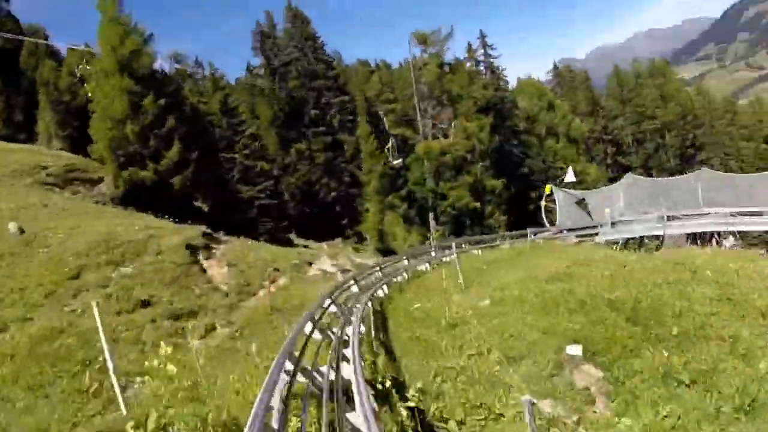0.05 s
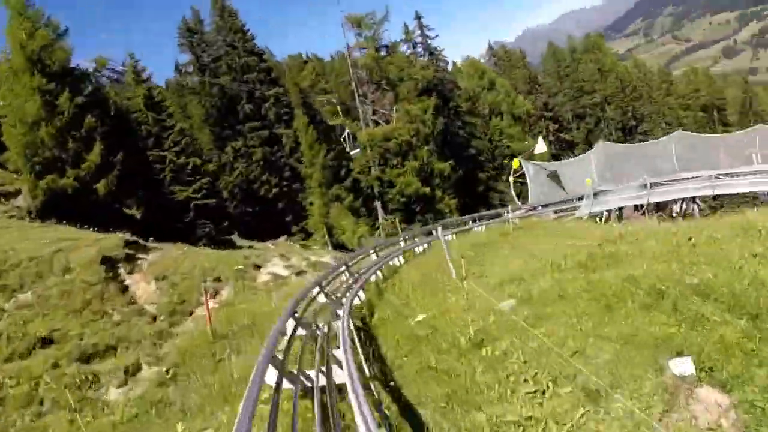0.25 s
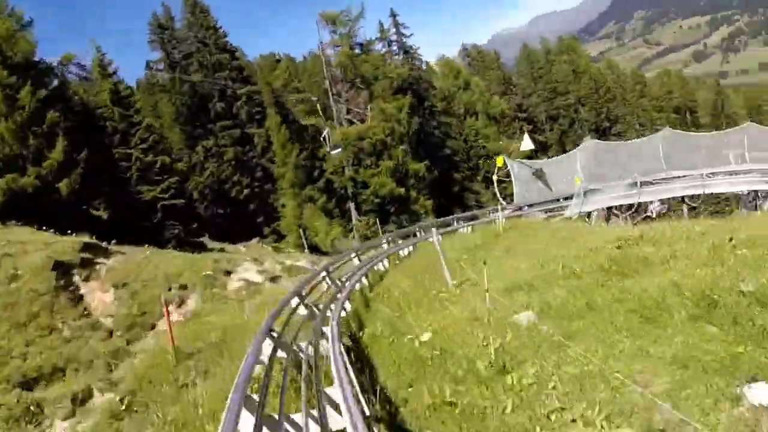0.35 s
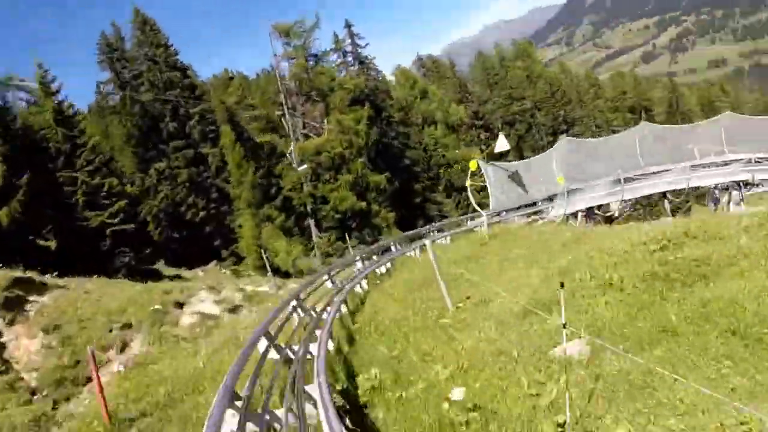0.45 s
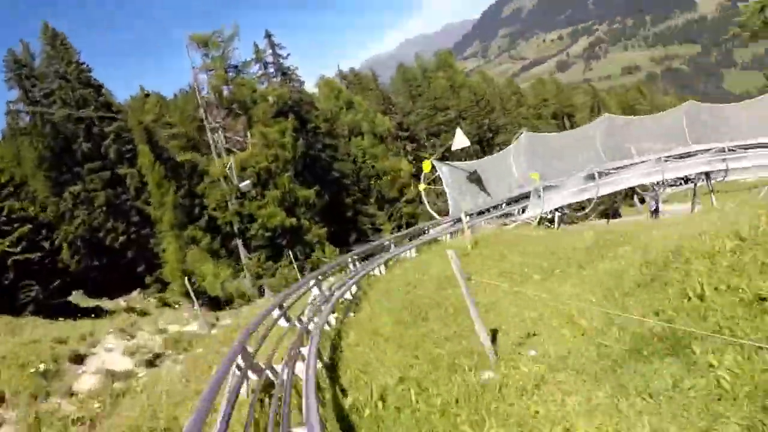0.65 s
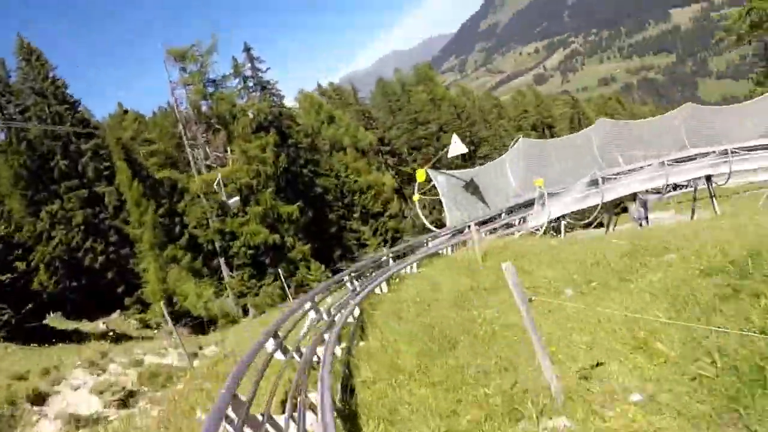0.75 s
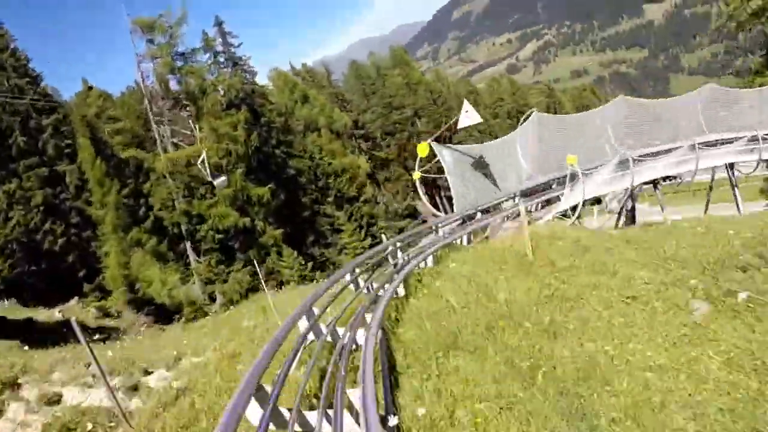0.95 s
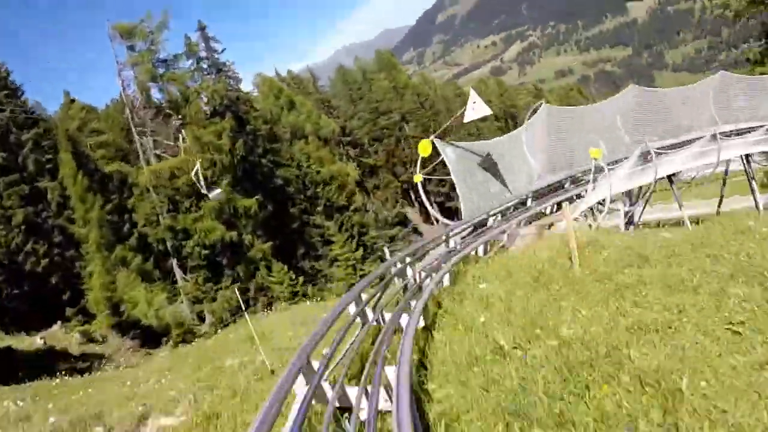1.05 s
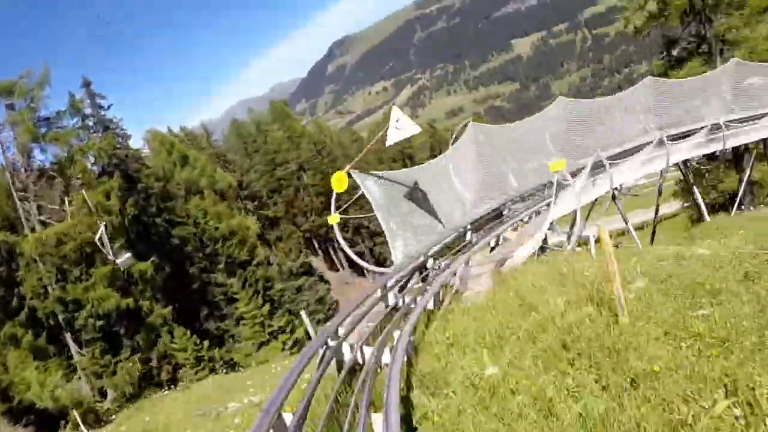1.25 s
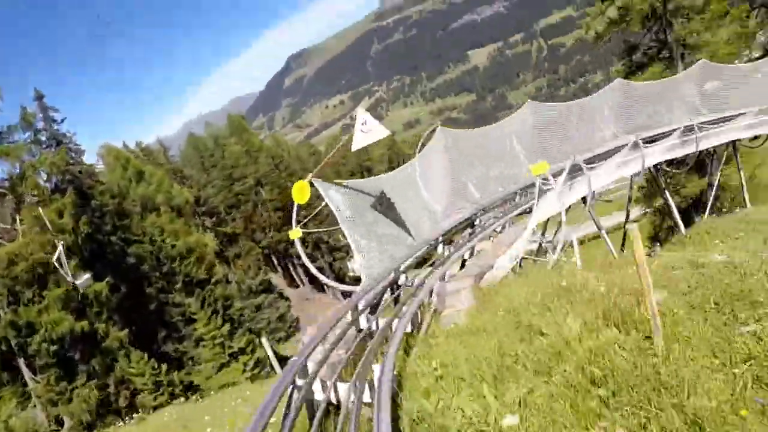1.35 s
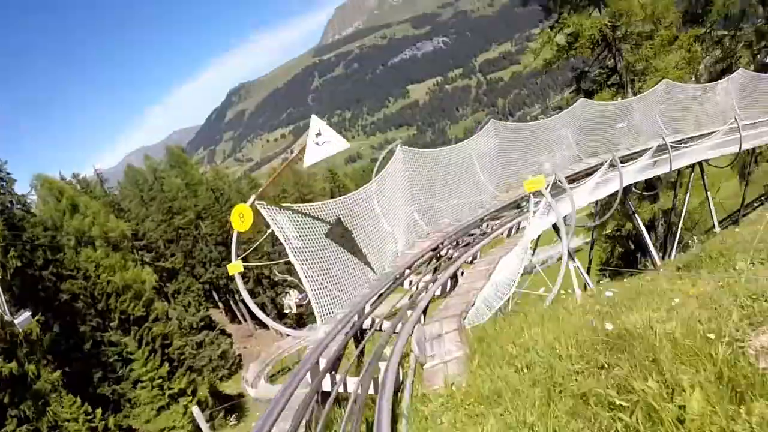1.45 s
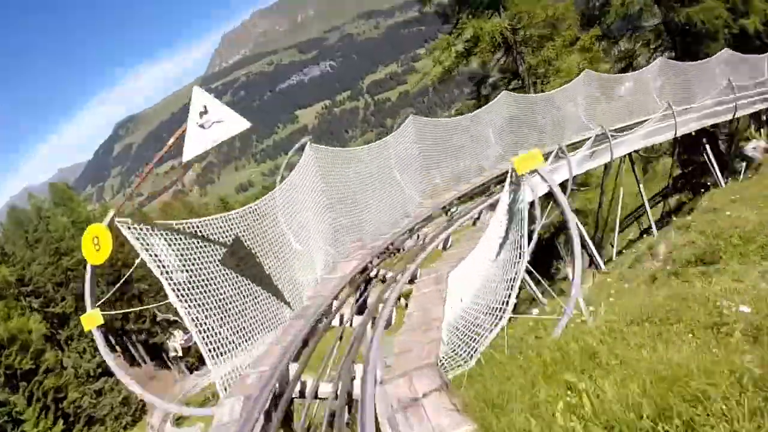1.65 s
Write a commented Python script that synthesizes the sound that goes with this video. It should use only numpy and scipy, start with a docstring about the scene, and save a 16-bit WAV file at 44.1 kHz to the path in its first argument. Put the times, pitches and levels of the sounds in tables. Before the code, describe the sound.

A coaster sled grinds through a bend on steel rails, heard on board outdoors. Low thumps and a brief squeal come first, then a knock and a quick run of clunks. Loose fittings rattle over deep wind rumble.

```python
"""The wheels of a coaster sled grind through a bend on tubular steel rails, heard on board in open air.
Friction drives the resonances of rail and wheel, and the flanges squeal. Uneven track sets the sled
shuddering and thumping on its suspension. Impacts at rail joints, a knock and then a run of clunks,
ring the frame. Loose fittings rattle, and chassis rumble and wind lie underneath."""
import sys
import numpy as np
from scipy import signal
from scipy.fft import rfft, irfft
from scipy.io import wavfile

SR = 44100
rng = np.random.default_rng(int(sys.argv[2]) if len(sys.argv) > 2 else 0)


def unload_wav(signal):
    """Save mono or channel-first audio to the path in sys.argv[1] as 16-bit WAV at rate SR, clipped to [-1, 1]."""
    wavfile.write(
        sys.argv[1],
        SR,
        np.round(np.clip(np.atleast_2d(signal).T, -1, 1) * 32767).astype(np.int16),
    )


N = 74970
T = np.arange(N) / SR
CUTOFF_HZ = 15700

# Modes of the sled's frame. Each row: frequency in Hz, relative level in dB, T60 in seconds.
FRAME_MODES = [(490, -8, 0.14), (649.5, -4, 0.16), (1203.4, 6, 0.048), (2198, 7, 0.049), (3177, -3, 0.32),
               (3580, -5, 0.23), (3763, -3, 0.053)]


def wheels():
    """Rolling noise: rough contact excites a roar, and a grind, ring and hiss that flutter together."""
    # Spectra of the rolling noise. Each row: frequency in Hz, relative spectral density in dB.
    roar_spectrum = [(70, 4.5), (120, 2.5), (180, 0), (260, -3), (380, -3), (550, -3.5), (850, -8.5),
                     (1400, -15.5), (3000, -48.5)]
    grind_spectrum = [(600, -24), (980, -5), (1180, -4), (1320, -0.5), (1580, -2.5), (1850, -6), (2200, -4),
                      (2800, -15.5), (4200, -26.5)]
    hiss_spectrum = [(1800, -13), (2700, -11.5), (3400, 8), (4300, 1.5), (5100, -1.5), (6700, -5),
                     (7600, -9.5), (10000, -18.5), (15000, -39.5)]
    # Envelopes through the bend. Each row: time in seconds, level in dB.
    roar_levels = [(0, -47.5), (.35, -48), (.55, -50.5), (.9, -47.5), (1.2, -46), (1.33, -49.5),
                   (1.7, -46.5)]
    grind_levels = [(0, -54), (.1, -52), (.32, -49.5), (.42, -53.5), (.56, -57.5), (.68, -51.5),
                    (.77, -50.5), (.94, -51.5), (1.12, -50.5), (1.22, -48), (1.38, -56), (1.42, -52),
                    (1.52, -55.5), (1.7, -54)]
    ring_levels = [(0, -50), (.2, -58.5), (.245, -46.5), (.28, -51), (.365, -49.5), (.41, -53), (.72, -53),
                   (.83, -48.5), (.95, -50), (1.1, -53.5), (1.23, -49.5), (1.3, -52.5), (1.7, -54.5)]
    grind_db = in_time(grind_levels)
    hiss_db = -65 + 0.56 * (grind_db - grind_db.mean())  # follows part of the grind's swing
    roar = from_db(in_time(roar_levels)) * coloured(rng.standard_normal(N), roar_spectrum)
    grind = from_db(grind_db) * coloured(friction(), grind_spectrum)
    ring = from_db(in_time(ring_levels)) * rail_ring()
    hiss = from_db(hiss_db) * coloured(friction(), hiss_spectrum)
    flutter = from_db(-0.86 * drift(rate_hz=17))  # uneven wheel contact
    return roar + (grind + ring + hiss) * flutter


def friction():
    """The contact force is broadband: smooth rubbing plus sparse, tiny impacts of grit."""
    grit_per_s, grit_power_share = 2200, 0.44
    sizes = rng.uniform(-1.1, 1, N)
    grit = rms_one(sizes * (rng.random(N) < grit_per_s / SR))
    rubbing = rng.standard_normal(N)
    return np.sqrt(grit_power_share) * grit + np.sqrt(1 - grit_power_share) * rubbing


def rail_ring():
    """Forced resonance: friction sustains each mode, which swells and sinks as the contact shifts."""
    # Modes of rail and wheel. Each row: frequency in Hz, bandwidth in Hz, relative gain in dB.
    rail_modes = [(1189, 39, 1.5), (1568, 84, -2.5), (2170, 110, -2), (2317, 90, 4), (3205, 100, -9.5),
                  (3520, 69, -12), (5020, 220, -19.5), (6500, 220, -25.5)]
    ring = 0
    for hz, width_hz, db in rail_modes:
        swell_db = 0.95 * drift(rate_hz=26)
        ring += from_db(db + swell_db) * resonance(friction(), hz, width_hz)
    return rms_one(ring)


def sled_body():
    """Nonlinear suspension: stiffer one way, it adds an octave to the sled's larger swings."""
    # Envelope of the shudder. Each row: time in seconds, level in dB.
    shudder_levels = [(0, -48), (.12, -33.5), (.45, -35), (.8, -28.5), (.95, -35.5), (1.3, -37.5),
                      (1.45, -38)]
    # Thumps over uneven track. Each row: time of the deepest dip in seconds, peak level in dB,
    # frequency in Hz, rise in seconds, fall in seconds.
    thumps = [(0.19, -12, 29.8, 0.017, 0.02), (.239, -6.5, 36, 0.019, 0.012),
              (0.283, -10.5, 31.3, 0.035, 0.0079), (0.335, -2, 35.3, .013, 0.023),
              (.382, -10, 45, 0.029, 0.029), (.467, -19.5, 34.7, 0.013, .012),
              (.617, -22, 45.7, 0.011, 0.014), (0.724, -16.5, 47, 0.019, 0.024),
              (.844, -17.5, 35.2, 0.013, 0.024), (0.914, -15, 34, 0.033, 0.011),
              (.946, -16.5, 43, 0.021, 0.029), (1.005, -8, 40.6, 0.015, 0.021),
              (1.053, -14.5, 42.9, 0.015, 0.028), (1.2, -2, 40.8, 0.036, 0.02),
              (1.308, -16, 37.1, 0.026, 0.025)]
    shudder_gain = from_db(in_time(shudder_levels) + 4 * drift(rate_hz=4.7))
    shudder = shudder_gain * rms_one(wavering(44.52, wander_hz=6.33, rate_hz=14.6))
    # Late in the bend the sled settles into a steady vibration.
    drone_start_s, drone_rise_s = 1.495, 0.022
    drone_gain = from_db(-22) * np.clip((T - drone_start_s) / drone_rise_s, 0, 1)
    drone = drone_gain * wavering(47.65, wander_hz=2.6, rate_hz=24)
    swing = shudder + drone + sum(bounce(*thump) for thump in thumps)
    # Squaring doubles the frequency; the high-pass removes the offset it leaves.
    octave = signal.sosfilt(signal.butter(1, 20, "high", fs=SR, output="sos"), swing ** 2)
    return swing - 0.25 * octave


def bounce(dip_s, db, hz, rise_s, fall_s):
    """Transient oscillation: the sled dips at a bump and swings briefly around that moment."""
    age = T - dip_s
    envelope = np.exp(-(age / np.where(age < 0, rise_s, fall_s)) ** 2)
    return -from_db(db) * envelope * np.cos(2 * np.pi * hz * age)


def rail_joints():
    """Impact excitation: a wheel strikes a joint, giving a dense crash and ringing the frame's modes."""
    # Wheel strikes. Each row: start in seconds, gain in dB, cutoff in Hz (higher for a harder contact).
    strikes = [(0.891, -41, 2480), (1.154, -34.5, 1630), (1.168, -34.5, 5460), (1.198, -45, 4550),
               (1.224, -50.5, 4000)]
    # Spectrum of the crash. Each row: frequency in Hz, relative spectral density in dB.
    crash_spectrum = [(100, 19), (250, -5.5), (600, 7), (880, -2), (1250, -0.5), (2000, -4), (2650, -7),
                      (3700, 0), (4500, -15.5), (7800, -12.5), (13000, -55.5)]
    attack_s, ring_db = 0.0019, -10
    clunks = 0
    for start, db, top_hz in strikes:
        crash = burst(start, attack_s, t60=0.17) * coloured(friction(), crash_spectrum)
        ring = 0
        for hz, mode_db, t60 in FRAME_MODES:
            mode = np.sin(2 * np.pi * (hz * T + rng.random()))
            ring += from_db(mode_db) * burst(start, attack_s, t60) * mode
        clunks += from_db(db) * softened(crash + from_db(ring_db) * ring, top_hz)
    return clunks


def fittings():
    """Contact chatter: loose fittings rattle and excite the frame; harder contacts are brighter."""
    # Rattles. Each row: start in seconds, gain in dB, T60 in seconds.
    rattles = [(.164, -50.5, 0.19), (0.217, -51.5, 0.11), (0.243, -47, 0.1), (0.302, -53.5, .06),
               (0.352, -52, 0.067), (.365, -53.5, .08), (0.418, -50.5, 0.052), (0.568, -52, .04),
               (0.648, -53, .04), (0.675, -52, 0.066), (0.784, -52.5, 0.032), (0.893, -44.5, 0.059),
               (0.921, -49.5, 0.047), (0.93, -54, 0.063), (.944, -51.5, 0.13), (0.996, -52, 0.045),
               (1.156, -46, 0.065), (1.171, -48.5, .04), (1.199, -48, 0.046), (1.415, -56.5, 0.8)]
    # Spectrum of the chatter. Each row: frequency in Hz, relative spectral density in dB.
    chatter_spectrum = [(500, -10), (1500, 3.5), (2300, 0), (2800, 5), (3500, 3.5), (4300, -4), (5200, 2),
                        (6700, -2.5), (8500, -12), (12000, -20.5), (15000, -35.5)]
    frame = sum(from_db(db) * resonance(friction(), hz, width_hz=52) for hz, db, _ in FRAME_MODES)
    chatter = coloured(friction(), chatter_spectrum) + from_db(-1.5) * rms_one(frame)
    mean_db = np.mean([db for _, db, _ in rattles])
    attack_s, db_per_octave = 0.0028, 8.5
    rattling = 0
    for start, db, t60 in rattles:
        top_hz = 7500 * 2 ** ((db - mean_db) / db_per_octave)
        rattling += from_db(db) * softened(burst(start, attack_s, t60) * chatter, top_hz)
    return rattling


def flanges():
    """Flange squeal: one narrow, wavering resonance of the metal swells and dies each time."""
    # Squeals. Each row: start in seconds, frequency in Hz, level in dB, rise and T60 in seconds.
    squeals = [(0.238, 2290, -39.5, .008, 0.055), (.72, 1448, -51.5, .06, 0.48),
               (0.872, 6450, -54, .004, 0.05), (.923, 3720, -59, .005, .16), (1.157, 7750, -60, .003, .06),
               (1.199, 5450, -59, .004, 0.06), (1.42, 2226, -48, .035, 0.16)]
    squealing = 0
    for start, hz, db, rise_s, t60 in squeals:
        tone = rms_one(wavering(hz, wander_hz=62, rate_hz=200))
        squealing += from_db(db) * burst(start, rise_s, t60) * tone
    return squealing


def chassis():
    """Random vibration of the chassis radiates a low rumble."""
    # Envelope of the rumble. Each row: time in seconds, level in dB.
    rumble_levels = [(0, -44.5), (.27, -47), (.5, -53.5), (1.02, -57), (1.11, -47.5), (1.2, -45.5),
                     (1.3, -58.5), (1.5, -64.5)]
    # Its spectrum. Each row: frequency in Hz, relative spectral density in dB.
    rumble_spectrum = [(85, 6), (140, 2), (210, -2), (300, -4), (420, -19.5)]
    return from_db(in_time(rumble_levels)) * coloured(rng.standard_normal(N), rumble_spectrum)


def wind():
    """Turbulence: air passing the microphone makes steady, very deep pressure noise."""
    # Spectrum of the wind. Each row: frequency in Hz, relative spectral density in dB.
    wind_spectrum = [(12, -1.5), (25, 9.5), (45, 1), (80, -13), (115, -39.5), (200, -58)]
    return from_db(-32) * coloured(rng.standard_normal(N), wind_spectrum)


def coloured(x, spectrum):
    """Spectral shaping: an excitation takes on a spectrum, rolled off past its ends, at unit rms."""
    hz, db = np.transpose(spectrum)
    f = np.maximum(np.arange(N // 2 + 1) * SR / N, 1)
    skirts = np.minimum(f / hz[0], 1) ** 2 * np.minimum(hz[-1] / f, 1) ** 3
    gain = from_db(np.interp(np.log(f), np.log(hz), db))
    return rms_one(irfft(rfft(x) * skirts * gain, N))


def resonance(x, hz, width_hz):
    """A damped two-pole resonator with unit gain at its peak."""
    radius = np.exp(-np.pi * width_hz / SR)
    numerator = np.array([1, 0, -1]) * (1 - radius ** 2) / 2
    denominator = [1, -2 * radius * np.cos(2 * np.pi * hz / SR), radius ** 2]
    return signal.lfilter(numerator, denominator, x)


def softened(x, top_hz):
    """A soft contact acts as a low-pass filter."""
    return signal.sosfilt(signal.butter(2, min(top_hz, CUTOFF_HZ), fs=SR, output="sos"), x + 1e-18)


def burst(start, attack_s, t60):
    """A linear rise, then exponential damping by 60 dB in t60 seconds."""
    age = np.maximum(T - start, 0)
    decay = np.exp(-np.log(1000) * np.maximum(age - attack_s, 0) / t60)
    return np.minimum(age / attack_s, 1) * decay


def wavering(hz, wander_hz, rate_hz):
    """Frequency modulation: the pitch of a sine wanders at random."""
    return np.sin(2 * np.pi * np.cumsum(hz + wander_hz * drift(rate_hz)) / SR)


def drift(rate_hz):
    """Random motion mostly below rate_hz, with zero mean and unit rms."""
    f = np.arange(N // 2 + 1) * SR / N
    low_pass = (f > 0) / (1 + (f / rate_hz) ** 4)
    return rms_one(irfft(rfft(rng.standard_normal(N)) * low_pass, N))


def in_time(levels):
    """Linear interpolation of an envelope at every sample."""
    return np.interp(T, *np.transpose(levels))


def from_db(db):
    """Decibels to amplitude gain."""
    return 10 ** (np.asarray(db) / 20)


def rms_one(x):
    """Scale to unit rms."""
    return x / np.sqrt(np.mean(x ** 2) + 1e-20)


def scene():
    """Superposition: all sources add at one point on the sled."""
    background = wind() + chassis()
    return (wheels() + sled_body() + rail_joints() + fittings() + flanges() + background)[None]


def record(dry):
    """Band limiting: a steep low-pass follows a 4 ms fade at each end."""
    fades = np.minimum(np.minimum(T, T[::-1]) / 0.004, 1)
    return signal.sosfilt(signal.cheby2(12, 70, CUTOFF_HZ, fs=SR, output="sos"), dry * fades)


dry = scene()
out = record(dry)
unload_wav(out)
```